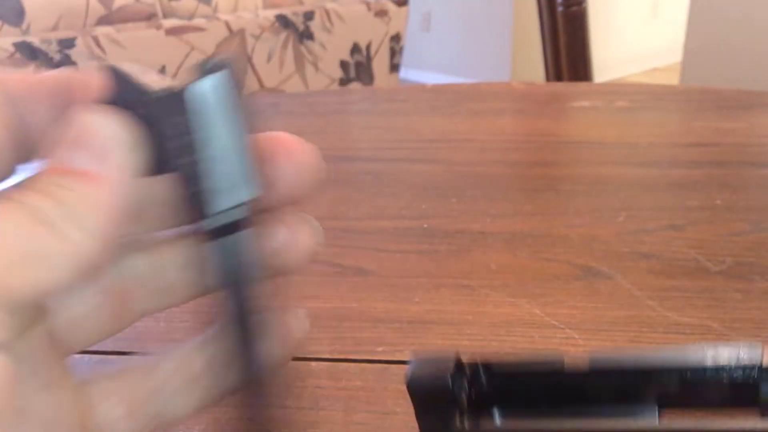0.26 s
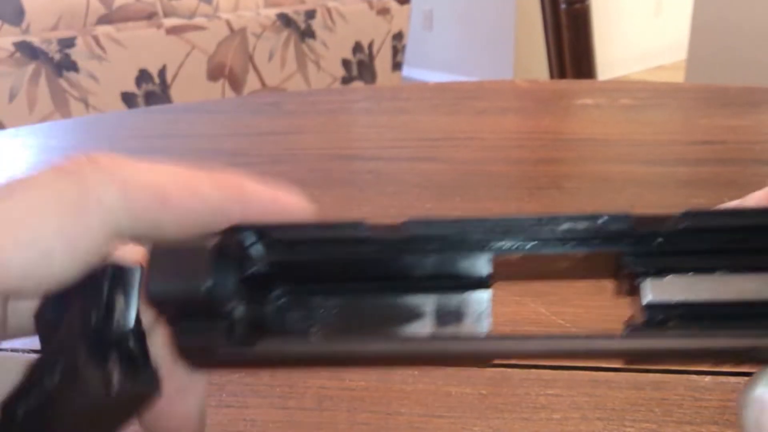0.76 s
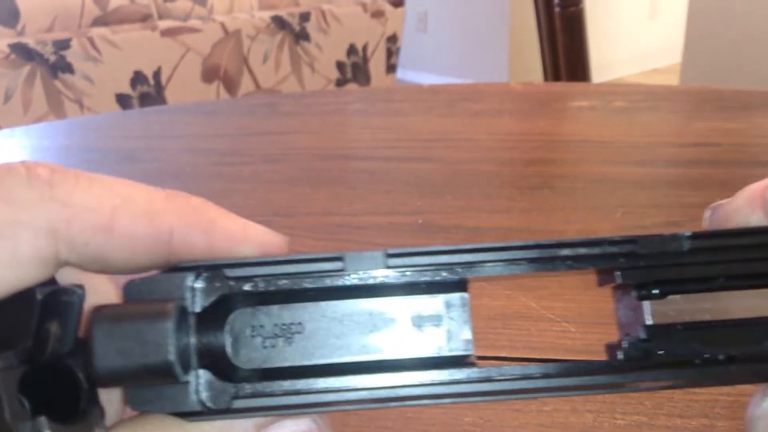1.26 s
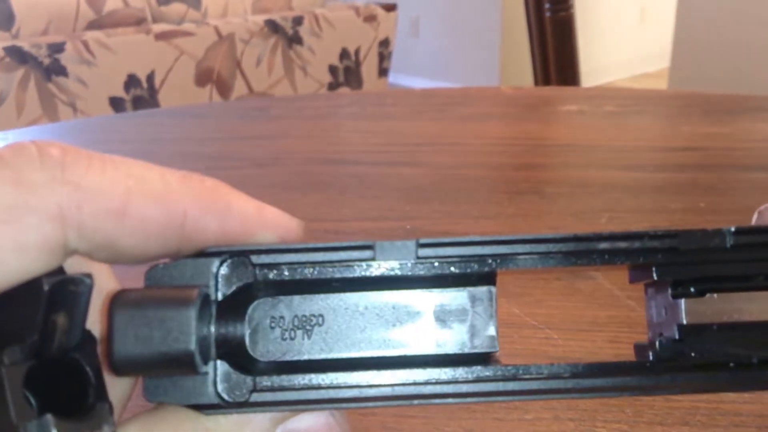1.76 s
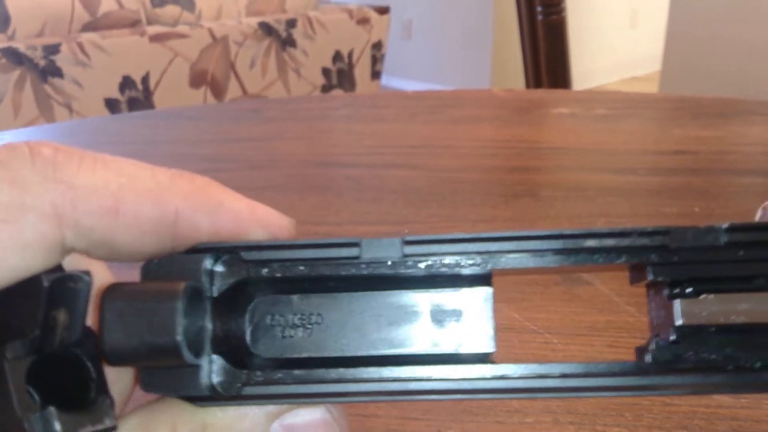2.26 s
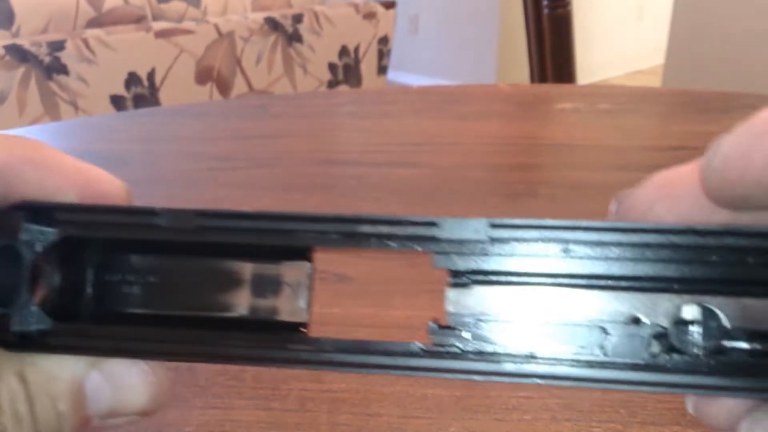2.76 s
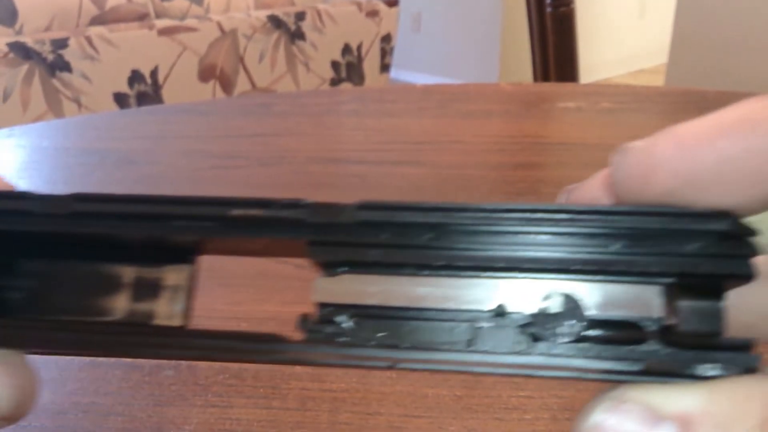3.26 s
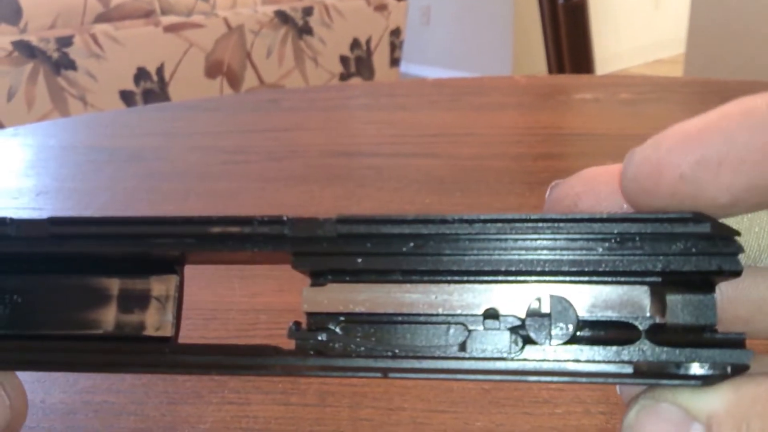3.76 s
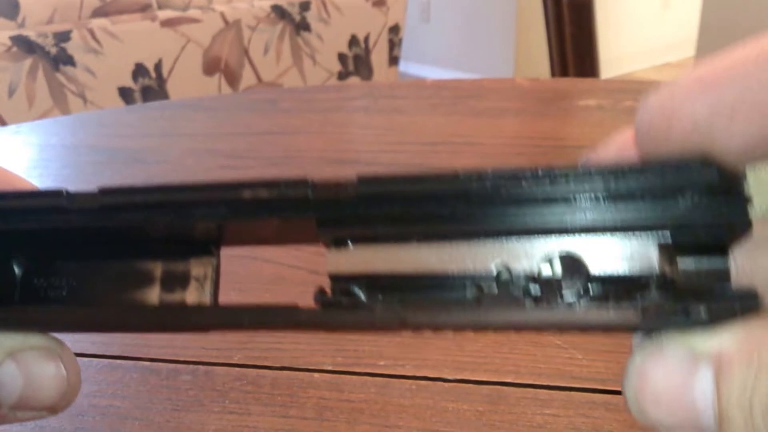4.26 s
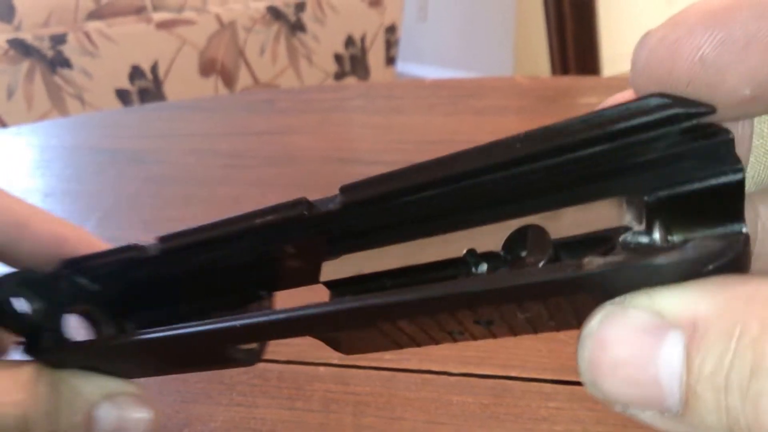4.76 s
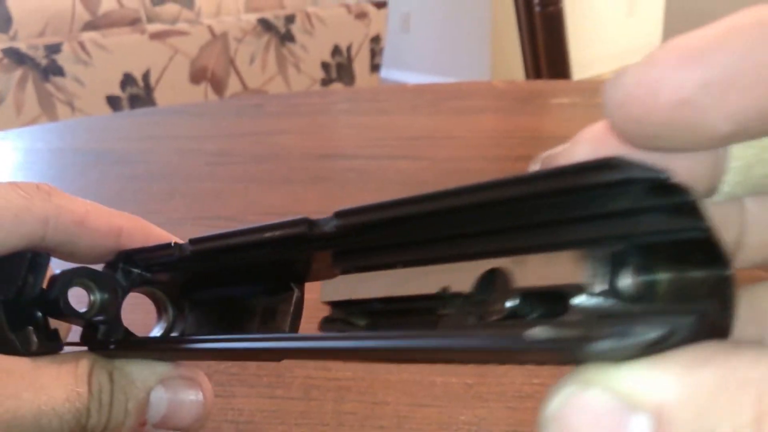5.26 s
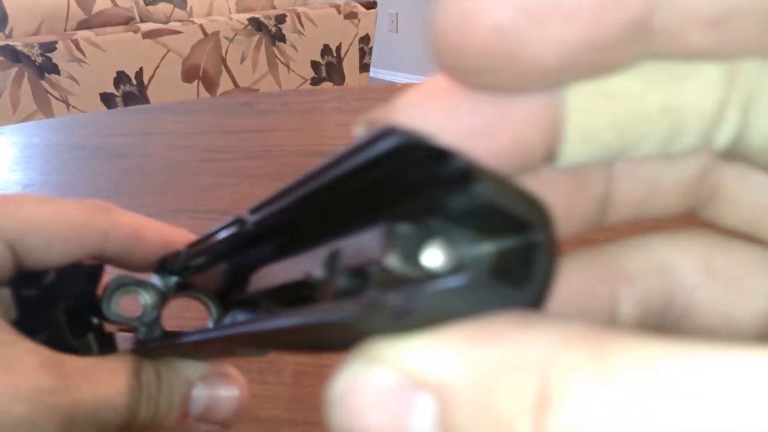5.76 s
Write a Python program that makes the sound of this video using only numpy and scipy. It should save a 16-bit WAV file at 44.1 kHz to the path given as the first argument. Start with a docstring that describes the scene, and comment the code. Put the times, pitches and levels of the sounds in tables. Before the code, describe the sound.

Close handling of metal gun parts: a ringing clink, ticking furniture creaks, soft finger rubs, then one loud metallic knock and light scrapes.

```python
"""A pistol slide and its barrel clink and scrape, turned in the hands over a wooden table in a quiet room.
Struck steel is a sum of decaying modes: the hands damp the slide while the barrel rings on at one note.
Sliding steel drives the same slide modes with random catches; skin on steel is coloured, grainy noise.
The wooden furniture creaks in dry ticks, each a filtered impulse with its scattering, over table-top modes.
The room answers with a near reflection and a decaying tail, over steady rumble, hiss and a faint drone."""
import sys
import numpy as np
from scipy import signal
from scipy.fft import rfft, irfft, next_fast_len
from scipy.io import wavfile
from scipy.ndimage import uniform_filter1d

SR = 44100
rng = np.random.default_rng(int(sys.argv[2]) if len(sys.argv) > 2 else 0)


def wav_out(sig):
    """Save sig, one row per channel (or a flat mono array), as 16-bit PCM at SR to the path in sys.argv[1]."""
    wavfile.write(sys.argv[1], SR, np.round(np.clip(np.atleast_2d(sig).T, -1, 1) * 32767).astype(np.int16))


N = 265041
T = np.arange(SR * 3 // 4) / SR  # time axis of one event [s]

# Contacts of steel with steel: (time [s], relative blow [dB], place on the slide [0 nose - 1 flank],
# hardness [dB/octave], barrel ring [dB], barrel t60 [s])
CONTACTS = [(0.0, -70, 0.27, -6, -47.5, 0.83), (0.593, -65, 0.011, 3, -92, .4),
            (0.8742, -27.5, 0, -0.5, -51, 1.8), (0.8825, -42, 0.13, 8, -46.5, 2.3),
            (1.0464, -37, 0.15, -1, -46, 0.69), (4.503, -59, 0.57, 14.5, -63.5, 1.4),
            (4.8035, -18, 0.94, 0, -23, 0.46), (5.455, -49.5, 0.49, 5, -82, .4),
            (5.549, -55, 0.5, 7.5, -73, 0.43), (5.689, -43, 0.47, -9, -62, .2)]
# Modes of the hand-held slide: (frequency [Hz], t60 before damping by contact [s],
# relative level struck at the nose [dB], relative level struck at the flank [dB], left-right difference [dB])
SLIDE_MODES = [(1427, 0.28, -17.5, -30.5, 0), (2263, 0.085, -1.5, -15.5, 9), (2896, 0.086, -15, -15.5, 1),
               (3143, 0.14, -10, 0, 16), (6350, 0.1, -3.5, -30, -6.5), (6530, 0.035, -41, 3.5, 3),
               (6870, 0.058, -16, -8, -12), (7780, 0.12, -31, -6, 6.5), (9134, 0.038, -1.5, -17.5, 40),
               (9030, 0.029, -1, -6.5, 30), (9710, 0.046, -3, -30, 21), (9850, 0.035, -35, -4, 20),
               (12250, 0.0308, -26, -22, 17), (15000, 0.034, -26, -20, 7)]
# Reverberation of the room: (frequency [Hz], t60 [s])
ROOM_DECAY = [(150, 0.53), (500, 0.45), (1500, 0.32), (4000, 0.47), (9000, 0.32), (15000, 0.23)]
# Spectral shape of room and microphone noise: (frequency [Hz], relative level [dB])
AIR_COLOUR = [(20, 3.5), (35, -5), (60, -5.5), (96, -21), (190, -17), (285, -19.5), (480, -27.5),
              (850, -32.5), (1500, -33.5), (2100, -39), (4000, -44.5), (7000, -37.5), (11000, -41.5),
              (15000, -43.5)]
# Likeness of the air noise at the two ports: (frequency [Hz], left-right likeness [0-1])
AIR_LIKENESS = [(60, 0.51), (180, 0.83), (550, 0.39), (1650, 0.046), (15000, .05)]
# Balance of the air noise: (frequency [Hz], left-right difference [dB])
AIR_BALANCE = [(60, -7.5), (180, -5), (550, -1), (1650, -3), (4970, -4), (15000, 3)]
# Strokes of a finger along the steel: (time of the peak [s], level [dB], rise by 20 dB [s],
# release by 20 dB [s], share of fingertip squeak against flat skin [0-1])
FINGER_STROKES = [(.24, -66.5, 0.26, 0.46, 0.73), (2.12, -66.5, 0.54, 0.2, 0), (2.74, -59, 0.7, 0.47, .25),
                  (2.93, -59, 0.11, 0.11, 1), (3.033, -52, 0.077, 0.063, 1), (3.25, -62.5, 0.6, 0.3, 0.84),
                  (3.75, -66, .6, 0.92, 0.74)]
# Spectral shape of flat skin rubbing: (frequency [Hz], relative level [dB])
FLAT_SKIN_COLOUR = [(600, -4), (1250, 2), (2000, -4), (2700, -1), (3400, -3), (4100, 0), (4800, -0.5),
                    (5500, -10.5), (7000, -15), (12000, -26)]
# Spectral shape of a squeaking fingertip: (frequency [Hz], relative level [dB])
FINGERTIP_COLOUR = [(1500, -11), (4500, -8.5), (5800, -6), (6900, 1.5), (8200, -4.5), (9800, -0.5),
                    (12000, -6.5), (15000, -14)]
# Slips of the wood joint: (time [s], relative strength [dB], brightness [0 woody - 1 snapping])
SLIPS = [(1.2837, -43, 0.93), (1.3335, -42.5, 0.97), (1.366, -40.5, 0.86), (1.3832, -44.5, 1),
         (1.4189, -44.5, 0.94), (1.4838, -44.5, 1), (1.6208, -43, 0.96), (1.675, -44, 0.96),
         (1.779, -43, 0.95), (1.876, -43.5, 0.95), (2.3438, -42.5, 0.96), (2.772, -47.5, 0.27),
         (3.3384, -37.5, 0.057), (3.3954, -37.5, 0.06), (3.475, -33.5, 0.089), (3.497, -35.5, 0.13),
         (3.5443, -34.5, .24), (3.93, -30.5, 0.2), (3.9682, -36, 0.21), (3.9958, -36, 0.2),
         (4.0324, -38.5, 0.16), (4.137, -35, 0.22)]
# Spectral shape of the bright snap: (frequency [Hz], relative level [dB])
SNAP_COLOUR = [(5500, -25.5), (7000, -5), (8200, -9), (9200, 4), (9800, 9.5), (10300, 2.5), (11000, -6.5),
               (13000, -9.5), (14700, -8), (16000, -37)]
# Spectral shape of what lingers after a snap: (frequency [Hz], relative level [dB])
SNAP_RING_COLOUR = [(7000, -37.5), (8500, -12.5), (9100, -13.5), (9450, -6), (10000, -45), (12000, -49)]
# Spectral shape of the woody crack: (frequency [Hz], relative level [dB])
CRACK_COLOUR = [(1200, -27), (2200, 4), (2900, 1), (3400, 4), (4300, 0.5), (5000, -2), (6000, 0),
                (6800, 7.5), (8200, -8.5), (10000, -28)]
# Spectral shape of the dull knock: (frequency [Hz], relative level [dB])
KNOCK_COLOUR = [(50, -23), (130, 2), (230, 5.5), (420, 1.5), (650, -2), (900, -2), (1200, 4), (1600, -3.5),
                (2400, -4), (5000, -38)]
# Modes of the table top: (frequency [Hz], t60 [s], relative level [dB])
TABLE_MODES = [(72.4, 0.28, -7), (138.2, 0.87, -6), (193.3, 0.35, -6), (231, 0.29, 3.5), (260, 0.27, -6.5),
               (403, 0.18, -3.5), (537.6, 0.23, -10), (871, 0.24, -9), (1214, 0.079, 3), (1455, 0.12, -4.5)]
# Dull shifts of the table: (time [s], relative level [dB], low-pass roll-off [Hz])
TABLE_SHIFTS = [(1.371, -35.5, 8000), (1.376, -40, 8000), (2.379, -37, 1980), (2.877, -37, 1200),
                (2.9, -39, 600), (2.945, -40, 750), (2.975, -45, 740), (3.9271, -28.5, 3460),
                (4.107, -28, 900), (4.156, -28, 260)]
# Pushes of steel sliding on steel: (time of the peak [s], pressure [dB], rise by 20 dB [s],
# release by 20 dB [s], place on the slide [0 nose - 1 flank], hardness at the peak [dB/octave])
PUSHES = [(4.509, -64, 0.013, 0.026, 0.3, 11), (4.617, -63.5, 0.028, .06, 0.6, 6.5),
          (4.8, -38, 0.023, 0.0066, 0.85, 2), (5.395, -66, 0.13, .11, 0.74, 6.5),
          (5.633, -52.5, .02, 0.033, .7, 3), (5.68, -52.5, 0.066, 0.15, 0.7, 3),
          (5.693, -37.5, 0.037, 0.012, 0.6, -11.5), (5.845, -63.5, 0.086, 0.12, 0.79, 5.5),
          (5.998, -67, 0.029, .05, 0.64, 10.5)]

PIVOT_HZ = 4000  # hardness tilts the slide's spectrum about this frequency
BARREL_HZ, DRIFT_HZ = 4253, 1.09  # the barrel's note, and its difference between the ports
# as the barrel turns, its extra leftward balance dies away; a touch on the flank adds to it
SWING_S, SWING_DB, SWING_FLANK_DB = .045, 1, 20
GRAB_S = .004  # decay constant of the barrel's old note once a new contact stops it
AIR_DB = -53
HOLD_DB, HOLD_TIP = -68.5, 0.44  # skin resting on the steel: level, fingertip share
SNAP_GAIN_DB, SNAP_RANGE_DB = 14.5, 23.5  # snap over the slip's strength; what full brightness adds
KNOCK_GAIN_DB, KNOCK_GROWS = 32, 1.226  # the knock grows faster than the slip's strength
LIGHT_HARDNESS_DB = 7  # per octave, for the lightest touch; each push moves it to its own peak hardness
TOP_HZ = 15700  # band limit of the microphones


def amp(db):
    """A level in decibels is 20 times the logarithm of the gain."""
    return 10 ** (np.asarray(db) / 20)


def unit(x):
    """Dividing by the root mean square gives unit effective amplitude."""
    return x / np.sqrt(np.mean(x ** 2) + 1e-20)


def fade(t, t60):
    """Exponential decay: the amplitude falls by 60 dB in t60."""
    return np.exp(-np.log(1000) * t / t60)


def pan(db):
    """Constant-power panning: left and right gains differ by db, positive to the left."""
    gains = amp([db / 2, -db / 2])
    return unit(gains)[:, None]


def along(points, hz):
    """Interpolation of (frequency, value) points on a logarithmic frequency axis."""
    f, v = np.transpose(points)
    return np.interp(np.log(hz + 1), np.log(f), v)


def filtered(x, response):
    """Linear filtering: the spectrum is multiplied by a function of frequency."""
    n = x.shape[-1]
    m = next_fast_len(n + 8192)
    return irfft(rfft(x, m) * response(np.fft.rfftfreq(m, 1 / SR)), m)[..., :n]


def causal(points, size=1024):
    """Minimum phase: folding the cepstrum gives a causal impulse response, here of energy 1."""
    cepstrum = irfft(np.log(amp(along(points, np.fft.rfftfreq(size, 1 / SR)))))
    cepstrum[1:size // 2] *= 2
    cepstrum[size // 2 + 1:] = 0
    h = irfft(np.exp(rfft(cepstrum)))
    return h / np.linalg.norm(h)


def add(track, s, sound):
    """Superposition: a sound is summed into the track from time s."""
    i = max(0, round(s * SR))
    track[:, i:i + sound.shape[-1]] += sound[:, :N - i]


def ports(x, lag_ms):
    """Difference of arrival time: the left microphone port hears the sound lag_ms after the right."""
    signs = np.array([[1], [-1]])
    return filtered(x, lambda hz: np.exp(-1j * np.pi * hz * lag_ms / 1000 * signs))


def mid_side_gains(likeness):
    """Coherence of two ports: the share of common and opposed sound sets their likeness."""
    turn = np.arccos(likeness) / 2
    return np.array([np.cos(turn), np.sin(turn)])


def room(x, wet_db, echo_db, echo_s):
    """Reverberation: one near wall reflection and a diffuse tail, alike at both ports in the bass."""
    hz, frame_s, z = signal.stft(rng.standard_normal((2, len(T))), SR, nperseg=256)
    decay = fade(frame_s, along(ROOM_DECAY, hz)[:, None])
    tail = signal.istft(z * decay, SR, nperseg=256)[1][:, :len(T)]
    tail *= 1 - np.exp(-T / 0.0026)
    wall = rng.standard_normal((2, len(T))) * fade(abs(T - echo_s), 0.018)
    answer = amp(wet_db) * tail / np.linalg.norm(tail[0])
    answer = answer + amp(echo_db) * wall / np.linalg.norm(wall[0])
    mid, side = filtered(answer, lambda hz: mid_side_gains(1 / (1 + (hz / 400) ** 2)))
    response = np.array([mid + side, mid - side])
    return pan(-2) * signal.fftconvolve(x.mean(0)[None], response, axes=1)[:, :x.shape[-1]]


def strength(hz, nose, flank, place, hardness):
    """Modal excitation: where and how hard the parts touch sets the gain of a slide mode."""
    return amp(nose + place * (flank - nose) + hardness * np.log2(hz / PIVOT_HZ))


def barrel_note(db, t60, place):
    """A single damped mode: the barrel's note swings between the ports as it turns, drifting in phase."""
    side_db = 8.9 * place - 7 + (SWING_DB + SWING_FLANK_DB * place) * np.exp(-T / SWING_S)
    sides = np.array([[.5], [-.5]])
    gains = amp(sides * side_db)
    gains = gains / np.sqrt(np.mean(gains ** 2, axis=0))
    note = np.sin(2 * np.pi * (BARREL_HZ + sides * DRIFT_HZ) * T)
    note = note * fade(T, t60) * (1 - np.exp(-T / 0.00058))
    return ports(amp(db) * gains * note, lag_ms=-0.2996)


def clinks():
    """Impact excitation: a contact rings the slide until the parts settle; the barrel holds its note."""
    out = np.zeros((2, N))
    settle = 1 / (1 + (T / 0.014) ** 4)
    band = signal.butter(2, [1400, 9000], "bandpass", fs=SR, output="sos")
    next_contacts = [row[0] for row in CONTACTS[1:]] + [N / SR]
    for (s, db, place, hardness, barrel_db, barrel_t60), next_s in zip(CONTACTS, next_contacts):
        ring = 0
        for hz, t60, nose, flank, side in SLIDE_MODES:
            mode = fade(T, t60) * np.sin(2 * np.pi * (hz * T + rng.random()))
            ring = ring + pan(side) * strength(hz, nose, flank, place, hardness) * mode
        noise = rng.standard_normal((2, len(T))) * fade(T, 0.023)
        crack = amp(-1.1 - 9.9 * place) * signal.sosfilt(band, noise)
        # a faint part of the ring outlasts the settling
        hit = amp(db) * (ring * (settle + amp(-25.5)) + crack) * (1 - np.exp(-T / 0.00037))
        # the next contact stops the barrel's note
        free = np.exp(-np.maximum(s + T - next_s, 0) / GRAB_S)
        barrel = free * barrel_note(barrel_db, barrel_t60, place)
        answer = room(hit, wet_db=-9.5 - 3.7 * place, echo_db=-6.0, echo_s=0.0107)
        add(out, s, ports(hit, lag_ms=-0.291) + barrel + answer)
    return out


def air():
    """Stationary noise: partly coherent rumble and hiss, with a faint narrow-band drone."""
    def colour(hz):
        likeness = np.clip(along(AIR_LIKENESS, hz), 0, 1)
        return amp(along(AIR_COLOUR, hz)) * (hz > 15) * mid_side_gains(likeness)

    mid, side = filtered(rng.standard_normal((2, N)), colour)
    signs = np.array([[1], [-1]])
    pair = filtered(np.array([mid + side, mid - side]),
                    lambda hz: amp(along(AIR_BALANCE, hz) * signs / 2))
    drone = unit(filtered(rng.standard_normal(N), lambda hz: 1 / (1 + ((hz - 190) / 6) ** 2)))
    return amp(AIR_DB) * unit(pair) + amp(-69.0) * drone


def swell(s, rise_s, release_s):
    """Exponential envelope: grows by 20 dB over rise_s to 1 at time s, drops as much over release_s."""
    t = np.arange(N) / SR - s
    return amp(-20 * np.maximum(-t / rise_s, t / release_s))


def fingers():
    """Friction noise: skin whispers along the slide in fine grains, swelling with each change of grip."""
    touches = [(amp(HOLD_DB), HOLD_TIP)]
    for s, db, rise, release, tip in FINGER_STROKES:
        touches.append((amp(db) * swell(s, rise, release), tip))
    # separate touches add in power
    flat_power = sum(gain ** 2 * np.clip(1 - tip, 0, 1) for gain, tip in touches)
    tip_power = sum(gain ** 2 * np.clip(tip, 0, 1) for gain, tip in touches)
    out = 0
    for colour, power in ((FLAT_SKIN_COLOUR, flat_power), (FINGERTIP_COLOUR, tip_power)):
        grain_db = 0.99 * unit(uniform_filter1d(rng.standard_normal(N), size=200))
        grains = rng.standard_normal((2, N)) * amp(grain_db)
        rub = filtered(grains, lambda hz: amp(along(colour, hz)))
        out = out + np.sqrt(power) * unit(rub)
    return pan(-2.5) * out


def burst(colour, t60, scatter):
    """Impulse and scattering: a sharp impulse and its diffuse wake in wood, energy 1 in each channel."""
    common = rng.standard_normal(len(T))
    spread = (common + 0.96 * rng.standard_normal((2, len(T)))) * fade(T, t60)
    spread *= scatter / np.linalg.norm(spread[0])
    spread[:, 0] += 1
    x = signal.fftconvolve(spread, causal(colour)[None], axes=1)[:, :len(T)]
    return x / np.linalg.norm(x, axis=1, keepdims=True)


def knock(db):
    """Plate response: the table top answers dully; its low modes grow more slowly than the thud."""
    body = amp(db) * burst(KNOCK_COLOUR, t60=0.064, scatter=3.1)
    modes = 0
    for hz, t60, level in TABLE_MODES:
        gain = amp(level + rng.normal(0, 0.46))
        modes = modes + gain * fade(T, t60) * np.sin(2 * np.pi * (hz * T + rng.random()))
    return pan(-2.5) * (body + amp(0.83 * db - 37.0) * modes * (1 - np.exp(-T / 0.0013)))


def creaks():
    """Stick-slip: each slip of the joint gives a bright snap, a woody crack and a knock."""
    out = np.zeros((2, N))
    for s, db, bright in SLIPS:
        snap_db = db + SNAP_GAIN_DB + SNAP_RANGE_DB * bright
        # the snap lies to the left, further when brighter; crack and knock lie to the right
        side = pan(2.6 * bright + 5)
        snap = amp(snap_db) * side * burst(SNAP_COLOUR, t60=0.0088, scatter=2.8)
        ring = amp(snap_db - 10) * side * burst(SNAP_RING_COLOUR, t60=0.013, scatter=4.2)
        crack = amp(db + 23) * pan(-4.5) * burst(CRACK_COLOUR, t60=0.02, scatter=6.1)
        low = knock(db=KNOCK_GAIN_DB + KNOCK_GROWS * db)
        direct = ports(snap + ring + crack + low, lag_ms=-0.2084)
        snap_room = room(ring + amp(-11.5) * snap, wet_db=-3.5, echo_db=-0.5, echo_s=0.0093)
        crack_room = room(crack, wet_db=-7.5, echo_db=-7.5, echo_s=0.0065)
        low_room = room(low, wet_db=-3.5, echo_db=-17, echo_s=0.012)
        add(out, s, direct + snap_room + crack_room + low_room)
        # a faint, softer copy of the crack and ring begins 2 ms before each slip
        add(out, s - .002, amp(-17.5) * (crack + ring))
    return out + table_shifts()


def table_shifts():
    """Low-passed impact: each dull shift of the table is a knock with its treble rolled off."""
    out = np.zeros((2, N))
    for s, db, soft_hz in TABLE_SHIFTS:
        low_pass = signal.butter(2, soft_hz, fs=SR, output="sos")
        low = signal.sosfilt(low_pass, knock(db=db + 13))
        add(out, s, low + room(low, wet_db=-5, echo_db=-10.5, echo_s=0.0079))
    return out


def scrape():
    """Frictional excitation: tiny catches of the sliding edges keep the slide's modes ringing."""
    # about 1500 catches a second
    catches = unit(rng.standard_normal(N) * (rng.random(N) < 1500 / SR))
    pushes = np.array([swell(s, rise, release) for s, _, rise, release, _, _ in PUSHES])
    _, db, _, _, place, peak_hardness = np.transpose(PUSHES)
    # the firmest push decides where and how hard the edges touch
    forces = amp(db)[:, None] * pushes
    firmest = forces.argmax(0)
    push = pushes[firmest, np.arange(N)]
    hardness = LIGHT_HARDNESS_DB + push * (peak_hardness[firmest] - LIGHT_HARDNESS_DB)
    catches = catches * forces.max(0)
    out = np.zeros((2, N))
    for hz, t60, nose, flank, side in SLIDE_MODES:
        # pressed together, the parts ring shorter
        mode = fade(T, t60 / 2) * np.sin(2 * np.pi * hz * T)
        drive = amp(-3.5) * catches * strength(hz, nose, flank, place[firmest], hardness)
        out += pan(side) * signal.fftconvolve(drive, mode / np.linalg.norm(mode))[:N]
    return ports(out, lag_ms=-0.34) + room(out, wet_db=-9.5, echo_db=-13.0, echo_s=0.015)


def scene():
    """Superposition of steel, air, skin and wood, with the room's answers."""
    return clinks() + air() + fingers() + creaks() + scrape()


def record(dry):
    """Band limitation: the response of the microphones falls very steeply above TOP_HZ."""
    return filtered(dry, lambda hz: 1 / np.sqrt(1 + (hz / TOP_HZ) ** 120))


dry = scene()
out = record(dry)
wav_out(out)
```